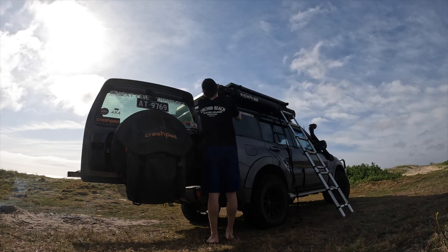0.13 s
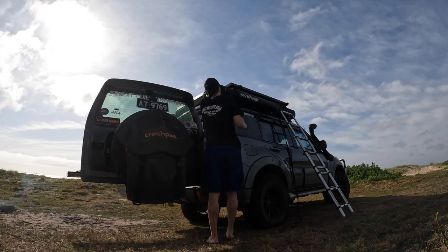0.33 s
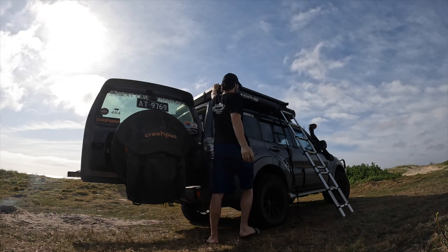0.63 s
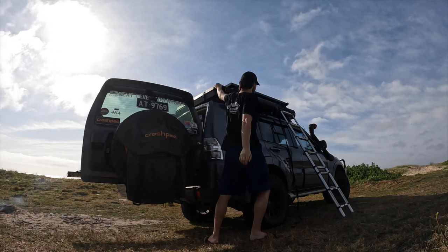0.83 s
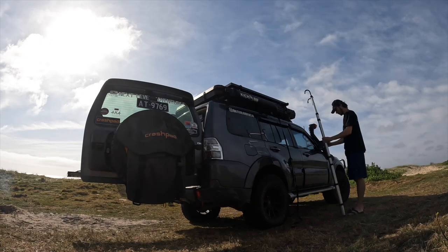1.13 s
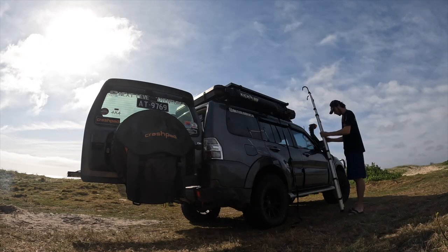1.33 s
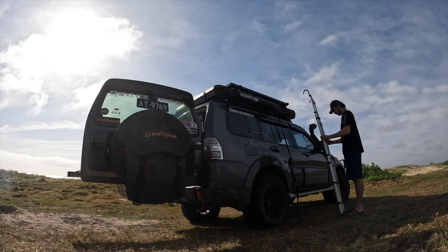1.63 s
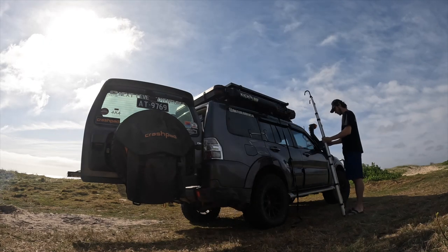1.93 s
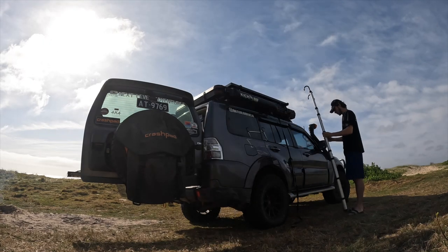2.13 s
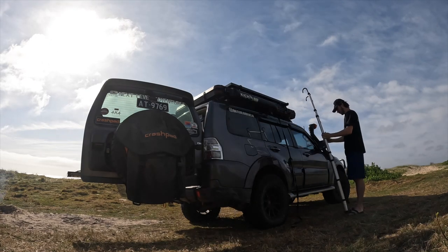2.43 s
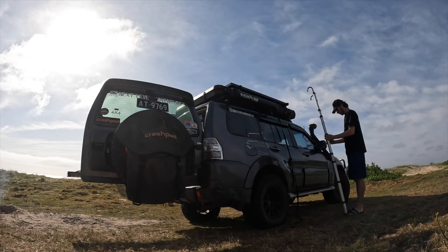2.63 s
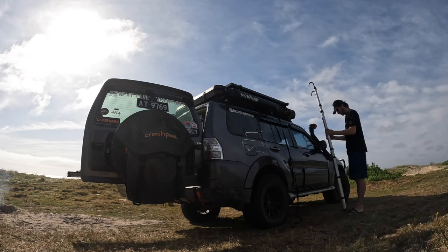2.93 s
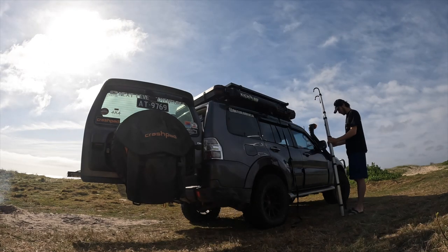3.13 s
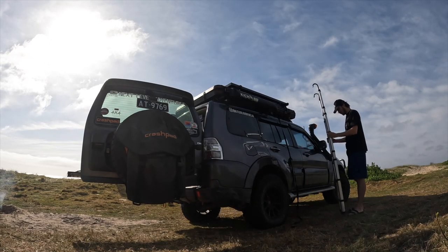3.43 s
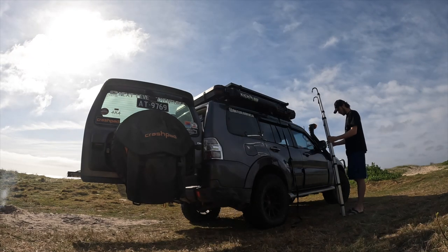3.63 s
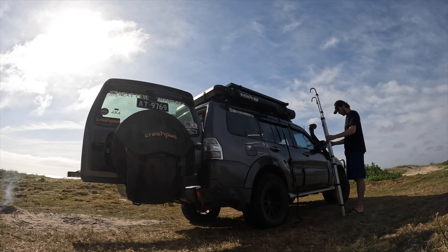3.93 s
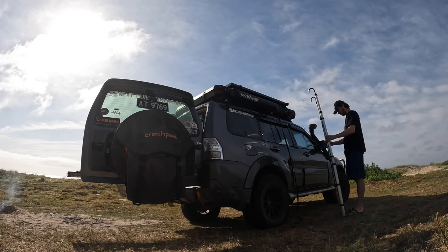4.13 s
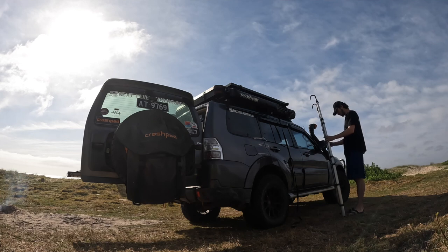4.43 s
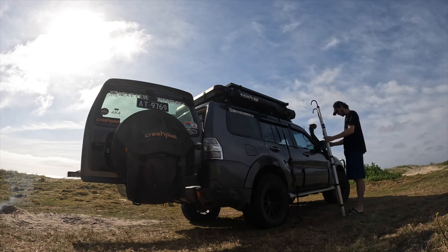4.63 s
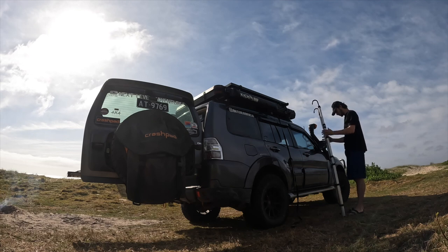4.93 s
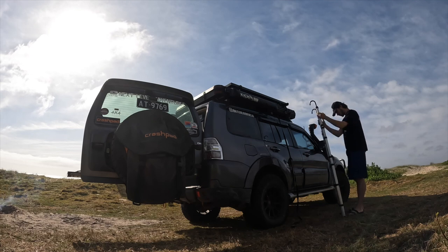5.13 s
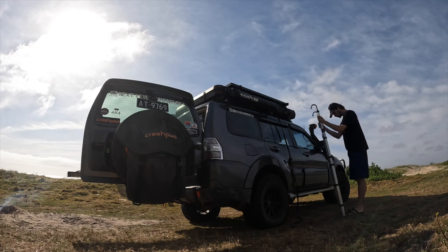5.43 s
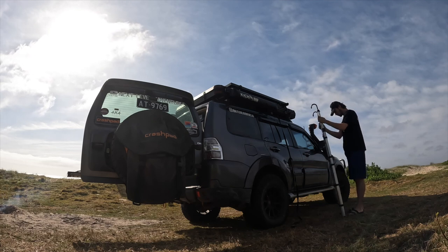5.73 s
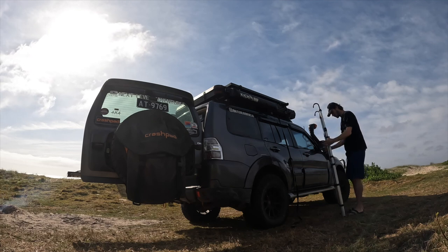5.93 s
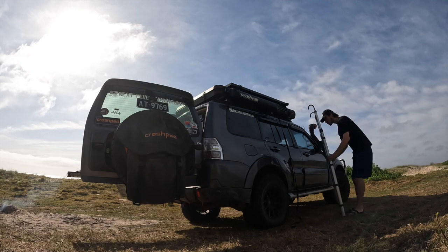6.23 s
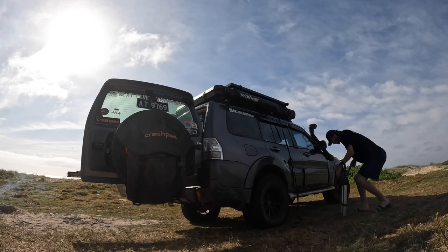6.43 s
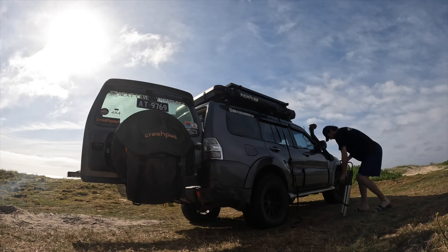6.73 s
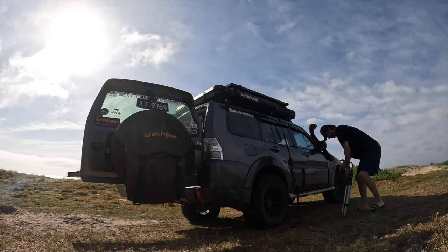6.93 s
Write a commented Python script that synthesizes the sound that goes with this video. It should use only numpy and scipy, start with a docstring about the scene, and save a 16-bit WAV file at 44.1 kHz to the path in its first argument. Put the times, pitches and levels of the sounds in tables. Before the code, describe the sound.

Seven sections of a telescopic metal ladder drop in turn with sharp double clacks and pin clicks, then handling knocks, over low wind rumble outdoors.

```python
"""Wind rumbles on the microphone over a soft outdoor wash, with a thin hiss on top for the first second.
A telescopic metal ladder beside a car knocks once at the very start, then its pins begin to click.
From about 1.1 s seven sections drop in turn: each slips with a thin squeal, touches the rung below, slams
home and rebounds; the stack scrapes on while spring pins rattle. Knocks, slides and squeaks of handling
follow, and a dry pop comes at 6.4 s. Noise bursts make the contacts and scrapes, fading sines the ringing."""
import sys
import numpy as np
from scipy import signal
from scipy.fft import rfft, irfft, next_fast_len
from scipy.io import wavfile
from scipy.ndimage import map_coordinates

SR = 44100
rng = np.random.default_rng(int(sys.argv[2]) if len(sys.argv) > 2 else 0)


def write(x):
    x = np.atleast_2d(x).T
    wavfile.write(sys.argv[1], SR, np.round(np.clip(x, -1, 1) * 32767).astype(np.int16))


N = 313110  # length in samples, about 7.1 s

# Colours (loudness at each pitch) of wind rumble, deep wind lumps, outdoor wash and high hiss.
# Each row: frequency in Hz, relative level in dB.
RUMBLE = [(12, -43), (20, -16.5), (75, -6), (113, -4), (199, -3.5), (276, -12.5), (307, -12.5), (348, -18),
          (381, -17.5), (466, -24.5), (503, -26.5), (752, -44), (800, -49), (1040, -52), (1760, -120)]
BUFFET = [(15, -14), (30, -6), (50, -1.5), (85, -2), (130, -8), (250, -24.5), (600, -42), (1500, -100)]
WASH = [(300, -0.5), (600, -1.5), (850, -6), (1020, 1), (1170, -2), (1330, -1.5), (2000, -7), (3000, -11.5),
        (4000, -16.5), (5200, -29), (6900, -20), (8600, -32), (10500, -34), (15000, -56)]
HISS = [(5000, -18), (8000, -12.5), (10600, -3), (12200, -29), (13500, -16), (15000, -8.5)]
# Strength of the wind. Each row: time in seconds, strength in dB (only its changes about the mean count).
WIND = [(0, -28), (0.3, -32), (0.45, -25), (0.92, -27.5), (1.1, -33.5), (2.15, -36), (2.45, -34.5),
        (3.65, -31.5), (3.85, -34), (4.7, -34), (5.1, -31), (5.75, -31), (6.15, -28.5), (6.55, -26),
        (7.1, -30.5)]
# How alike left and right are. Each row: frequency in Hz, likeness (1 means identical).
WIND_ALIKE = [(60, .999), (150, .997), (300, .985), (700, .85)]
WASH_ALIKE = [(60, 1.0), (150, 1.0), (380, 0.99), (950, 0.81), (2380, 0.66), (5980, 0.62), (15000, 0.49)]
# Eddies that strike each microphone port on its own. Each row: time of the peak in seconds, peak level in dB.
EDDIES = [(.2, -46), (.65, -38), (.97, -37)]

# Single knocks of the tubes as the ladder is handled. Each row: start in seconds, chatter length in seconds,
# level in dB ahead of the knock's own gain, extra bass in dB, extra treble in dB.
KNOCKS = [(0.001, 0.0074, -22.5, 4, -5), (3.278, 0.0055, -27.5, -5, 5), (3.666, 0.01, -38, -1, -10),
          (4.358, .004, -46, 7, -5), (4.422, .004, -32.5, 1, -5), (4.435, 0.0027, -35.5, 0, -6),
          (4.893, 0.007, -33, 0, -9.5), (5.436, 0.0053, -34.5, 2, -2.5), (5.465, .004, -36.5, 0, -4),
          (5.489, 0.0059, -25.5, -1, -5.5), (5.499, .0045, -35, -6, 3), (5.563, .009, -33, -14, 2)]
# Colour of the clatter of a knock. Each row: frequency in Hz, relative level in dB.
KNOCK_COLOUR = [(150, -7), (330, -10.5), (430, -2.5), (620, -5), (780, -12.5), (1080, 0), (1850, -2.5),
                (3000, 0.5), (4200, -3.5), (5300, -9.5), (7200, -5.5), (8400, -14.5), (10500, -15),
                (14500, -30.5)]
# Ring of the hollow tubes. Each row: frequency in Hz, relative level in dB, time to fade by 60 dB in seconds.
TUBE = [(1156, -17, 0.066), (1436, 13, 0.061), (1551, 14, 0.049), (2080, 7.5, 0.098), (2410, -5, 0.17),
        (2646, 0.5, 0.19), (2900, 2.5, 0.11), (3240, -20, 0.2), (3697, -5, 0.12), (4350, -17, 0.2),
        (4490, 0, 0.13), (6130, 2, .1), (6500, -8, 0.068), (7400, -2, 0.11)]

# Light dry ticks of hands, straps and grass. Each row: time in seconds, level in dB ahead of colouring.
TICKS = [(0.942, -35.5), (4.008, -44.5), (4.719, -50), (5.856, -52), (6.768, -51), (6.97, -59)]
# Colour of a tick. Each row: frequency in Hz, relative level in dB.
TICK_COLOUR = [(1500, -25), (3500, 3), (5200, -11), (7000, -1), (8500, -13), (10300, -3.5), (12500, -14),
               (15000, -14)]
# Spells of handling with fainter ticks. Each row: one edge of the spell in seconds, other edge in seconds.
HANDLING = [(2.24, 2.2), (4.1, 4.42), (6.6, 7.05)]

# Latch pins locking. Each row: time in seconds, level in dB, extra body (lower pitches) in dB.
CLICKS = [(0.9422, -48.5, 20), (1.2657, -32, 9), (1.307, -30.5, 4), (1.666, -32, 10), (1.6994, -27, 1.5),
          (1.715, -28, 4.5), (2.025, -18, -10), (2.3362, -30.5, -5), (2.4687, -21, 9), (2.8785, -33, 2),
          (2.8903, -28.5, -10), (3.338, -38.5, 7), (3.7296, -36.5, 12), (3.748, -34, -4), (5.5689, -29, 12),
          (5.6415, -43, 5)]
# Colour of the snap of a pin. Each row: frequency in Hz, relative level in dB.
CLICK_COLOUR = [(400, -22), (1100, -19), (2200, -4), (3700, -6), (4400, 7), (5400, 2.5), (7300, 2.5),
                (8600, -10.5), (11000, -12.5), (14500, -33)]
# Ring of a latch. Each row: frequency in Hz, relative level in dB, time to fade by 60 dB in seconds.
LATCH = [(3150, -12, 0.047), (4410, -1.5, 0.032), (5000, -3, 0.019), (5100, -25, .02), (6120, 3, 0.013),
         (7230, 7, 0.0051), (7370, -7, 0.016), (11500, -27, .02)]

# Sections dropping. Each row: time of touch in seconds, slip before it in seconds, time from touch to slam
# in seconds, then levels in dB ahead of each sound's own gain: slip, squeal, touch, slam; extra bass in dB,
# extra treble in dB, level of the jolted pin in dB, level of the scrape in dB.
DROPS = [(1.191, 0.043, .017, -41, -50, -35, -25.5, 2.5, 2.5, -31, -42),
         (1.598, .046, 0.0071, -44, -55, -20.5, -26, 2, -5, -17.5, -43.5),
         (1.964, .06, .007, -44, -54, -28, -18.5, 0.5, -2, -19.5, -38),
         (2.364, 0.051, 0.0078, -46, -68, -23, -23, 2, 1.5, -19, -37.5),
         (2.789, .066, .008, -59.5, -72, -20.5, -23.5, 3, 4.5, -26, -42.5),
         (3.215, 0.038, .014, -48, -53, -29, -21, 2, 1.5, -32, -41),
         (3.618, .045, 0.0058, -47.5, -55, -22, -23, 4.5, 1, -27, -43)]
# Thin squeaks. Each row: start in seconds, length in seconds, starting pitch in Hz, change of pitch by the end
# as a share of it, level in dB.
SQUEAKS = [(1.407, 0.048, 2400, -0.024, -59), (4.003, .026, 6140, 0.0038, -57),
           (4.585, 0.075, 4960, -0.019, -62), (4.626, 0.017, 1950, -0.0058, -51),
           (6.58, .3, 2900, -0.054, -64), (6.88, .28, 2670, -.03, -62)]
# Tubes eased along by hand. Each row: start in seconds, end of the stroke in seconds,
# level in dB ahead of the slide's own gain, extra treble in dB.
SLIDES = [(4.315, 4.742, -52.5, 4.5), (5.384, 5.558, -47.5, 5), (6.622, 7.08, -67, 3)]
# Colour of a slide. Each row: frequency in Hz, relative level in dB.
SLIDE_COLOUR = [(500, -35), (850, -7), (1100, 4), (2600, 5), (4200, 1), (5300, -7), (7200, -2), (8400, -13),
                (10500, -12), (14500, -25.5)]

# Sound scattered by grass and bodywork. Each row: frequency in Hz, level in dB.
SCATTER = [(1000, -14), (3000, -8), (8000, -15.5), (12000, -6)]
# Loudness by side at full offset. Each row: frequency in Hz, left minus right in dB.
SHADE = [(200, 2), (700, -4), (1300, -4), (2400, -5), (4400, -5.5), (8000, -3.5), (12000, 1.5)]
# Timing by side at full offset. Each row: frequency in Hz, lead of the left in radians.
LEAD = [(300, 0.007), (1000, -0.41), (2600, -1.14), (4400, -1.22), (6000, -0.73), (11000, -0.3)]
# Microphone roll-off. Each row: frequency in Hz, gain in dB.
MIC = [(13500, 0), (14500, -11), (15700, -26)]

BUFFET_GROWS, RUMBLE_GROWS = 1.45, 0.45  # dB that each layer gains for one dB more wind
EDDY_FADE_DB_PER_S = 150  # on both sides of the peak
AIR_DB = -50.5
FAINT_TICK_DB = -64.5  # ahead of colouring
# every drop: the release tap (dB over the slip), the rub of the slip (share of the time before the touch)
RELEASE_S, RELEASE_OVER_SLIP_DB, RELEASE_TREBLE_DB = .004, 2, -3
SLIP_SHARE, SLIP_TREBLE_DB = 0.87, 2.5
SQUEAL_LEAD_S, SQUEAL_S, SQUEAL_HZ, SQUEAL_GLIDE = .008, 0.031, 7860, -0.0095
TOUCH_BASS_DB, TOUCH_TREBLE_DB, SLAM_S = -2.5, -5.5, .009
REBOUND_AFTER_S, REBOUND_S, REBOUND_DB, REBOUND_BASS_DB = 0.015, .007, -34, 1.5
SCRAPE_AFTER_S, SCRAPE_S, SCRAPE_TREBLE_DB = .014, 0.11, -0.5
# spring pins: body of the one jolted by the rebound, and the faint rattle of loose ones during the scrape
PIN_BODY_DB, LOOSE_DB, LOOSE_SPREAD_DB, LOOSE_BODY_DB, LOOSE_S = -1, -38.5, 6, 8, .08
PLACE = 0.57  # how far the ladder is off centre, 0 to 1
TOP_HZ = 15750  # nothing is kept from here up


def amp(db):
    """Turn decibels into a gain."""
    return 10 ** (np.asarray(db) / 20)


def unit(x):
    """Scale to an rms (average strength) of 1."""
    return x / np.sqrt(np.mean(x ** 2) + 1e-20)


def along(points, hz):
    """Read (Hz, value) points, joined by lines on a log frequency axis."""
    point_hz, values = np.transpose(points)
    return np.interp(np.log(hz + 1), np.log(point_hz + 1), values)


def curves(rows):
    """Give one value per sample for each column after the time."""
    times, *columns = np.transpose(rows)
    return [np.interp(np.arange(N) / SR, times, column) for column in columns]


def wobble(rate, size=N):
    """Draw a smooth random curve through so many random points a second."""
    points = rng.standard_normal(int(size * rate / SR) + 4)
    return map_coordinates(points, [np.arange(size) * rate / SR])


def filtered(x, response):
    """Change each frequency of a full-length sound by a given response."""
    padded = next_fast_len(N + SR // 4)
    spectrum = rfft(x, padded) * response(np.fft.rfftfreq(padded, 1 / SR))
    return irfft(spectrum, padded)[..., :N]


def coloured(x, colour, tilt, size=16384):
    """Colour a short sound at unit power, then tilt it, with a filter that never sounds ahead of its input."""
    hz = np.fft.rfftfreq(size, 1 / SR)
    gain = unit(amp(along(colour, hz))) * amp(along(tilt, hz))
    # folding the cepstrum makes the filter respond as early as it can
    cepstrum = irfft(np.log(gain))
    cepstrum[1:size // 2] *= 2
    cepstrum[size // 2 + 1:] = 0
    return irfft(rfft(x, size) * np.exp(rfft(cepstrum)))[:len(x)]


def rush(colour, alike):
    """Make coloured stereo noise of rms 1; a shared part and an opposite part set how alike the sides are."""
    def split(hz):
        angle = np.arccos(np.clip(along(alike, hz), -1, 1)) / 2
        return amp(along(colour, hz)) * [np.cos(angle), np.sin(angle)]

    mid, side = filtered(rng.standard_normal((2, N)), split)
    return unit(np.array([mid + side, mid - side]))


def add(track, s, sound):
    """Mix a sound into a track at time s in seconds."""
    part = track[max(round(s * SR), 0):][:len(sound)]
    part += sound[:len(part)]


def energy(x, seconds):
    """Scale to the energy of a sound of rms 1 that lasts so many seconds."""
    return x * np.sqrt(seconds * SR / np.sum(x ** 2))


def ring(modes, t, detune):
    """Add up the fading tones of struck metal, each with a new strength, phase and slightly new pitch."""
    total = np.zeros(len(t))
    for hz, db, t60 in modes:
        strength, shift, phase = rng.standard_normal(3)
        fade = amp(db + 2.2 * strength - 60 * t / t60)
        total += fade * np.sin(2 * np.pi * hz * (1 + detune * shift) * t + np.pi * phase)
    return total


def crack(t, t60, tail_db):
    """One hard contact: a spike and the dense, fast-dying scatter behind it."""
    scatter = energy(rng.standard_normal(len(t)) * amp(-60 * t / t60), 1 / SR)
    return (t == 0) + amp(tail_db) * scatter


def wind(buffet_db=-37, rumble_db=-33.5, lumps_db=2):
    """One wind strength drives a rumble and, more steeply, deep lumps; stray eddies hit each port alone."""
    strength_db, = curves(WIND)
    gust_db = strength_db - strength_db.mean()
    lumps = unit(amp(lumps_db * wobble(12)) * rush(BUFFET, WIND_ALIKE))
    rumble = rush(RUMBLE, WIND_ALIKE)
    t = np.arange(N) / SR
    eddy_gain = sum(amp(db - EDDY_FADE_DB_PER_S * np.abs(t - s)) for s, db in EDDIES)
    eddies = eddy_gain * rush(BUFFET, [(50, 0.031)])  # left and right almost unrelated
    lumps_gain = amp(buffet_db + BUFFET_GROWS * gust_db)
    rumble_gain = amp(rumble_db + RUMBLE_GROWS * gust_db)
    return lumps_gain * lumps + rumble_gain * rumble + eddies


def air(hiss_db=-63, hiss_end=1.005):
    """The soft wash of open country is gently wavering noise; a thin high hiss lies over its first second."""
    wash = amp(AIR_DB + 0.5 * wobble(3.57)) * rush(WASH, WASH_ALIKE)
    hiss_on = np.arange(N) / SR < hiss_end
    return wash + amp(hiss_db) * hiss_on * rush(HISS, [(10000, 0.17)])


def knock(span, bass_db, treble_db, contact_rate=900, t60=0.027, spike_db=-7, ring_db=-11, gain_db=2.0):
    """Tube meets rung and chatters: a quick volley of contacts, each cracking and ringing the tubes."""
    t = np.arange(SR // 8) / SR
    span = max(span, 1 / SR)
    count = 1 + int(span * contact_rate)
    order = np.arange(count)
    when = (order + rng.random(count) * (order > 0)) / count * span  # the first is on time
    volley = np.zeros(len(t))
    volley[(when * SR).astype(int)] = rng.choice([-1, 1], count) * amp(rng.normal(0, 3, count))
    # each contact feeds countless short-lived modes, whose energies add
    stored = np.abs(signal.fftconvolve(volley ** 2, amp(-60 * t / t60) ** 2)[:len(t)])
    scatter = energy(np.sqrt(stored) * rng.standard_normal(len(t)), span)
    clatter = scatter + amp(spike_db) * energy(volley, span)
    # a heavy landing favours the low modes, a hard one the high modes
    tilt = [(1200, bass_db), (1900, 0), (4000, 0), (5500, treble_db)]
    modes = [(hz, level + along(tilt, hz), life) for hz, level, life in TUBE]
    tubes = energy(signal.fftconvolve(volley, ring(modes, t, detune=0.0103))[:len(t)], span)
    return amp(gain_db) * (coloured(clatter, KNOCK_COLOUR, tilt, size=8192) + amp(ring_db) * tubes)


def handling():
    """The ladder is shifted by hand: single knocks, locking pins, slow slides and squeaks."""
    track = np.zeros(N)
    for s, length, db, bass_db, treble_db in KNOCKS:
        add(track, s, amp(db) * knock(length, bass_db, treble_db))
    for s, db, body_db in CLICKS:
        add(track, s, amp(db) * click(body_db))
    for start, end, db, treble_db in SLIDES:
        add(track, start, amp(db) * slide(end - start, treble_db))
    for s, length, hz, glide, db in SQUEAKS:
        add(track, s, amp(db) * squeak(length, hz, glide))
    return track


def ticks(t60=0.026, tail_db=9, count=4):
    """Tiny bright contacts with no ring: a few clear ones, and faint ones strewn over each spell of handling."""
    track, t = np.zeros(N), np.arange(SR // 20) / SR
    faint = [(start + rng.random() * (end - start), FAINT_TICK_DB)
             for start, end in HANDLING for _ in range(count)]
    for s, db in TICKS + faint:
        add(track, s, amp(db) * energy(crack(t, t60, tail_db), 0.002))
    return filtered(track, lambda hz: unit(amp(along(TICK_COLOUR, hz))))


def click(body_db, tail_db=3.0, t60=0.026, ring_db=-4):
    """A spring pin snaps home: one sharp contact and a short bright ring."""
    t = np.arange(SR // 20) / SR
    contact = energy(crack(t, t60, tail_db), 0.0013)
    snap = coloured(contact, CLICK_COLOUR, [(3500, body_db), (5000, 0)], size=4096)
    return snap + amp(ring_db) * energy(ring(LATCH, t, detune=0.019), 0.0022)


def drops(loose_count=4):
    """Each section slips, touches, slams and rebounds, jolting a pin; the stack scrapes and loose pins rattle."""
    track = np.zeros(N)
    for (touch, slip, gap, slip_db, squeal_db, touch_db, slam_db,
         bass_db, treble_db, pin_db, scrape_db) in DROPS:
        release, slam = touch - slip, touch + gap
        rebound, scrape = slam + REBOUND_AFTER_S, slam + SCRAPE_AFTER_S
        add(track, release - SQUEAL_LEAD_S, amp(squeal_db) * squeak(SQUEAL_S, SQUEAL_HZ, SQUEAL_GLIDE))
        release_tap = knock(RELEASE_S, TOUCH_BASS_DB, RELEASE_TREBLE_DB)
        add(track, release, amp(slip_db + RELEASE_OVER_SLIP_DB) * release_tap)
        add(track, release, amp(slip_db) * slide(SLIP_SHARE * slip, SLIP_TREBLE_DB))
        add(track, touch, amp(touch_db) * knock(gap, bass_db + TOUCH_BASS_DB, TOUCH_TREBLE_DB))
        add(track, slam, amp(slam_db) * knock(SLAM_S, bass_db, treble_db))
        add(track, scrape, amp(scrape_db) * slide(SCRAPE_S, SCRAPE_TREBLE_DB))
        for share in (np.arange(loose_count) + rng.random(loose_count)) / loose_count:
            loose_gain = amp(rng.normal(LOOSE_DB, LOOSE_SPREAD_DB))
            add(track, scrape + share * LOOSE_S, loose_gain * click(LOOSE_BODY_DB))
        add(track, rebound, amp(REBOUND_DB) * knock(REBOUND_S, REBOUND_BASS_DB, treble_db))
        add(track, rebound, amp(pin_db) * click(PIN_BODY_DB))
    return track


def squeak(length, hz, glide, waver=0.014, flutter_db=4):
    """An unsteady tone that swells, flutters and fades."""
    size = int(length * SR)
    pitch = hz * (1 + glide * np.linspace(0, 1, size) + waver * wobble(597, size=size))
    swell = np.sqrt(np.hanning(size)) * amp(flutter_db * wobble(44.5, size=size))
    return unit(swell * np.sin(2 * np.pi * np.cumsum(pitch) / SR))


def slide(length, treble_db, grain_db=3.0, rattle_rate=130, rattle_db=5, t60=0.035, rub=0.66,
          fade_db=4, uneven_db=2.0, gain_db=-1.0):
    """Tube rubs in tube: a fine scrape, with small loose rattles, that loses force as it goes."""
    length = max(length, .01)
    t = np.arange(int(length * SR) + SR // 25) / SR
    edges = np.clip(np.minimum(t, length - t) / 0.0053, 0, 1)  # short fade in and out
    stroke = edges * amp(uneven_db * wobble(44, size=len(t)) - fade_db * t / length)
    # each rattle stores energy that drains away within a few milliseconds
    hits = rng.random(len(t)) < rattle_rate / SR
    rattles = hits * amp(rng.normal(0, rattle_db, len(t))) * stroke
    stored = np.abs(signal.fftconvolve(rattles ** 2, amp(-60 * t / t60) ** 2)[:len(t)])
    rattle_power = stored * length * SR / (stored.sum() + 1e-9)
    force = np.sqrt(rub * stroke ** 2 + (1 - rub) * rattle_power)
    grain = unit(rng.standard_normal(len(t)) * amp(grain_db * wobble(1500, size=len(t))))
    return amp(gain_db) * coloured(force * grain, SLIDE_COLOUR, [(3500, 0), (9500, treble_db)], size=32768)


def pop(s=6.4036, db=-20, fade=0.0015):
    """One dry pop: a sudden step in the waveform that dies away."""
    track, t = np.zeros(N), np.arange(SR // 50) / SR
    add(track, s, -amp(db) * np.exp(-t / fade))
    return track


def outdoors(x, echo_db=-12, t60=0.1):
    """The ladder is a little to the right; the car's side mirrors it once, grass and bodywork scatter a tail."""
    detour = .00272  # seconds by which the mirrored sound comes late

    def mirror(hz):
        bright = hz ** 2 / (hz ** 2 + 1000 ** 2)  # the echo is weak in the bass
        return 1 + amp(echo_db) * bright * np.exp(-2j * np.pi * hz * detour)

    x = filtered(x, mirror)
    t = np.arange(SR // 5) / SR
    tail_shape = amp(-60 * t / t60) * (t > .002)
    tails = np.array([energy(rng.standard_normal(len(t)) * tail_shape, 1 / SR) for _ in range(2)])
    smeared = signal.fftconvolve(x[None], tails, axes=1)[:, :N]
    scattered = filtered(smeared, lambda hz: amp(along(SCATTER, hz)))
    sides = np.array([[.5], [-.5]])  # left and right each take half the difference
    aside = filtered(x, lambda hz: amp(sides * along(SHADE, hz)) * np.exp(1j * sides * along(LEAD, hz)))
    return PLACE * aside + (1 - PLACE) * x + scattered


def scene():
    """Ladder, pop, wind and open air together."""
    ladder = outdoors(drops() + handling() + ticks())
    return ladder + pop() + wind() + air()


def record(dry):
    """The microphone chain rounds off the tallest peaks and keeps nothing above its band limit."""
    ceiling, hardness = .62, 4
    rounded = dry / (1 + np.abs(dry / ceiling) ** hardness) ** (1 / hardness)
    return filtered(rounded, lambda hz: amp(along(MIC, hz)) * (hz < TOP_HZ))


dry = scene()
out = record(dry)
write(out)
```